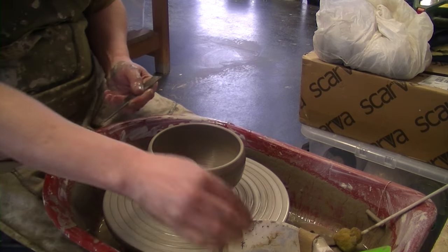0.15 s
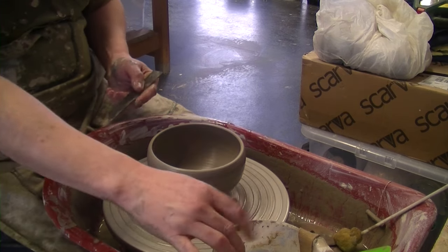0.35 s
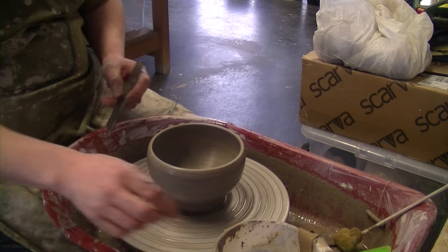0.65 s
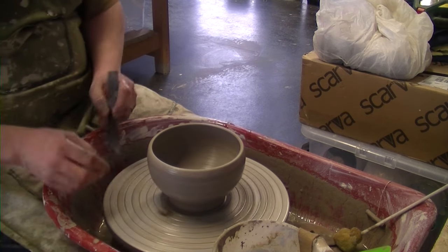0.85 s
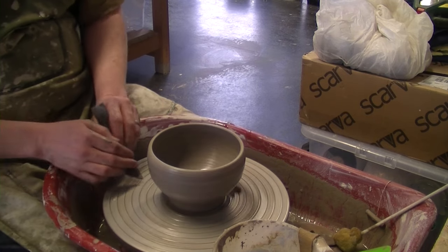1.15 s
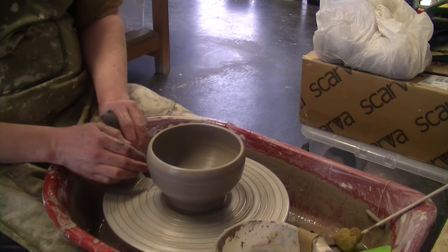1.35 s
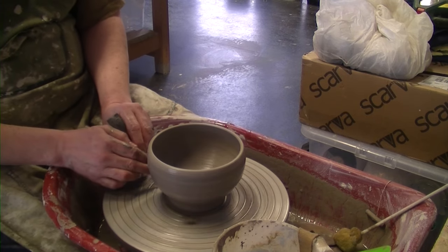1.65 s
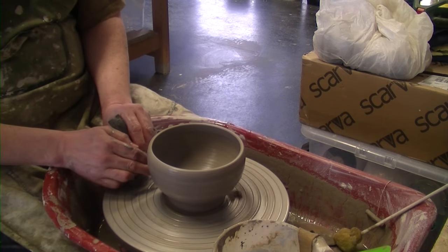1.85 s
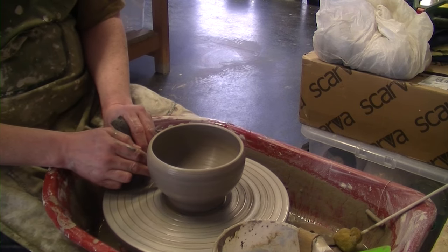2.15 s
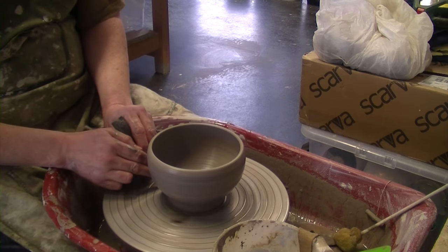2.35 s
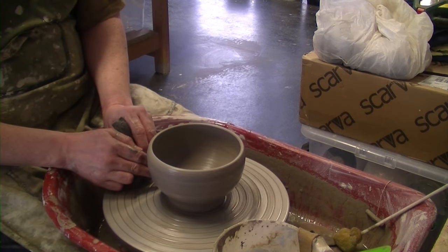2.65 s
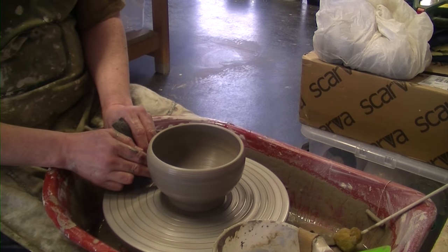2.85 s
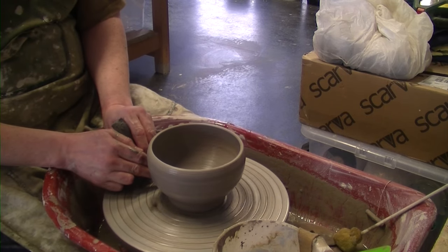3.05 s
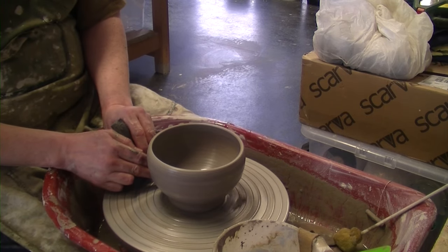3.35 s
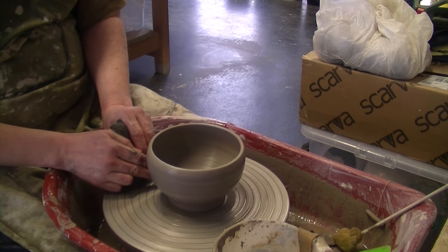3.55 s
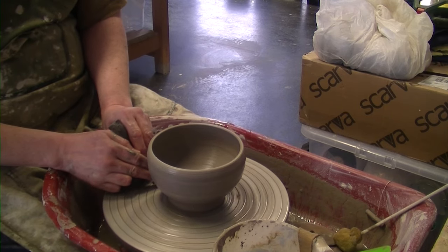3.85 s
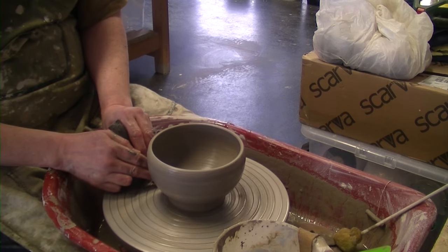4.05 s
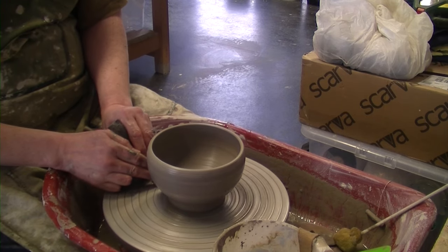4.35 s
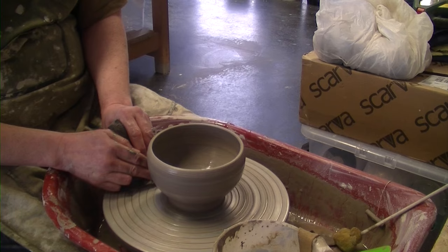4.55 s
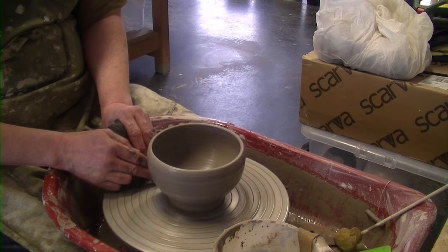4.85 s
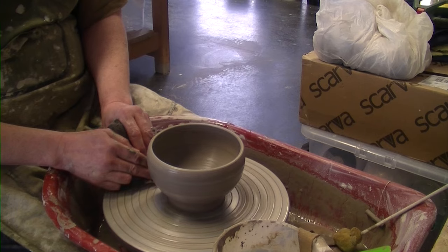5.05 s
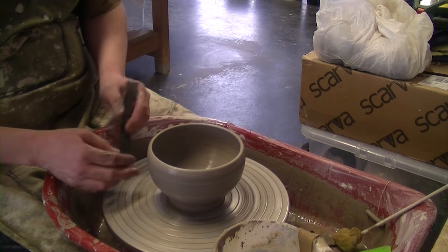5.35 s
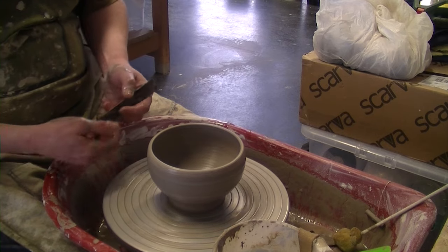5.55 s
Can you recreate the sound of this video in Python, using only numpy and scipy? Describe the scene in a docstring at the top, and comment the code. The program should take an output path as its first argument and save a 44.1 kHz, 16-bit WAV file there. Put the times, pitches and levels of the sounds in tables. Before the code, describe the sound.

Hands handle wet clay over a humming potter's wheel, then a tool scrapes the turning bowl, squealing slightly before flicking away.

```python
"""An electric potter's wheel hums and rumbles in a workshop. Hands shift and pick at wet things,
a tool is laid down with a tap, and palms slide over clay. The hum and rumble grow louder, then hold.
At 2.4 s a wooden tool bites into the foot of the spinning bowl, and grit rattles under its edge.
As it digs in, the scrape brightens and friction makes it sing and squeal.
At 5.3 s the tool is flicked away, and a few last ticks, bumps and rustles follow."""
import sys
import numpy as np
from scipy import signal
from scipy.fft import rfft, irfft
from scipy.io import wavfile
from scipy.ndimage import uniform_filter1d

SR = 44100
rng = np.random.default_rng(int(sys.argv[2]) if len(sys.argv) > 2 else 0)


def pcm_store(signal):
    """Save signal as 16-bit PCM."""
    levels = np.round(np.clip(np.atleast_2d(signal), -1, 1) * 32767)
    wavfile.write(sys.argv[1], SR, levels.astype(np.int16).T)


N = 250929
TIME = np.arange(N) / SR
FREQ = np.maximum(np.fft.rfftfreq(2 * N, 1 / SR), 1)

# Levels compare rows within a table. A rise, fall or decay is the time for a change of 60 dB.
# tone colour of the room's hiss: (frequency [Hz], level [dB])
HISS_COLOUR = [(2000, 0), (4300, 2.5), (5500, -8), (8000, -3), (15500, -14)]
# tones of the motor frame, mostly multiples of the mains frequency: (pitch [Hz], level [dB])
HUM_TONES = [(100.1, -29.5), (300.15, -10.5), (476.1, -19.5), (500.25, 1.5), (524.4, -17), (1297, -26.5),
             (1396.5, -17.5), (1497, -25.5), (1597, -25), (2245, -26), (2293, -26)]
# wavering tones of the drive: (pitch [Hz], level [dB])
DRIVE_TONES = [(158, -24), (240, -15), (323, -12.5), (359, -8), (424, -24.5)]
# tone colour of belt and bearings: (frequency [Hz], level [dB])
RUMBLE_COLOUR = [(25, -37), (55, -34), (85, -18), (130, -16), (200, -4.5), (280, -3), (335, 1.5), (480, 2),
                 (640, -2), (720, -3), (950, -12), (1200, -20.5), (1450, -18.5), (1900, -20), (2300, -18),
                 (2700, -28.5), (3200, -32), (4500, -27.5), (8000, -34.5)]

# arm movements that rustle a sleeve: (time [s], level [dB], rise [s], fall [s])
SLEEVE_MOVES = [(.115, -28, 0.82, 0.8), (.635, -37.5, 0.52, .28), (5.31, -28.5, .04, 0.52),
                (5.6, -36, 0.86, .45)]
# tone colour of the cloth: (frequency [Hz], level [dB])
SLEEVE_COLOUR = [(150, -5.5), (700, 1), (1200, -5), (2200, -11), (4000, -13), (10000, -23.5), (15500, -28)]
# palms sliding over wet clay: (time [s], level [dB], rise [s], fall [s])
PALM_SLIDES = [(.8, -41.5, .22, .7), (.93, -38.5, 0.98, 3), (1.22, -47.5, 0.9, 3.0)]
# tone colour of skin on clay: (frequency [Hz], level [dB])
PALM_COLOUR = [(900, 4), (2200, -1.5), (4200, -5), (4620, -4), (5000, -8), (6700, -7), (7900, -13.5),
               (9200, -16), (10200, -14), (11000, -17), (15500, -26)]
# the tool's flat side rubs the fingers, later the bowl: (time [s], level [dB], rise [s], fall [s])
TOOL_RUBS = [(.83, -47, .25, .9), (.95, -46, 0.97, 0.82), (3.92, -28.5, 1, 1.4)]
# where that rubbing rings: (frequency [Hz], width [Hz], level [dB])
RUB_RESONANCES = [(4600, 300, -4), (9140, 1800, 0)]
# ticks of wet clay: (time [s], level [dB])
CLAY_TICKS = [(.103, -21), (.117, -19), (.127, -18), (.643, -31), (.994, -30), (1.777, -34), (1.791, -35),
              (1.908, -28), (1.992, -35), (5.322, -18), (5.342, -17), (5.360, -17), (5.370, -18.5),
              (5.386, -24), (5.480, -28), (5.569, -27), (5.583, -20)]
# tone colour of a tick: (frequency [Hz], level [dB])
TICK_COLOUR = [(900, -22), (2000, -4), (3500, 4), (5500, -6.5), (9000, -6.5), (15000, -18)]
# bumps of hand and tool: (time [s], level [dB], decay [s], centre [Hz], width [Hz], hardness [0-1])
HAND_BUMPS = [(0.048, -24.5, 0.047, 900, 1800, 0), (.06, -43, 0.49, 115, 80, 0.1),
              (.098, -22, 0.19, 435, 650, 0), (0.115, -25, .07, 800, 1400, 0),
              (0.633, -38.5, .12, 3500, 2000, 0), (5.393, -14, 0.0076, 1160, 1200, 1),
              (5.393, -21, 0.04, 240, 220, 0.96), (5.588, -18, 0.042, 480, 420, 0.4),
              (5.599, -18, 0.029, 680, 600, 0.96), (5.599, -33, 0.026, 6800, 800, .7)]
# ringing of a tool laid on the splash pan: (pitch [Hz], level [dB], decay [s])
KNOCK_TONES = [(694, -27.5, 0.11), (977, -9.5, 0.021), (1150, -30, .04)]

# how far the edge has dug in: (time [s], depth [0 grazing, 1 cutting, 2 buried])
CUT_DEPTHS = [(3.1, 0.033), (3.27, 0.29), (3.7, 0.52), (3.83, 0.74), (4.05, 1.18), (4.3, 1.66), (5.3, 1.95)]
# tone colour of grit at each depth: (frequency [Hz], grazing [dB], cutting [dB], buried [dB])
GRIT_COLOUR = [(400, -10, -5, -6), (1020, -7, -11.5, -22), (2085, -3.5, 1, 3.5), (3200, -5.5, -1, -4.5),
               (4140, -1.5, 0, -2), (6530, -3.5, -0.5, -0.5), (9700, -13.5, -1, 3.5), (11200, -8, -5.5, -2),
               (13800, -12, -1.5, 3), (15400, -14, -10, -5.5)]
# boosts where tool and bowl ring: (frequency [Hz], width [Hz], grazing [dB], cutting [dB], buried [dB])
TOOL_RESONANCES = [(1166, 34, 9.5, 10, 22), (1782, 116, 6, 7, 8), (1970, 92, 1.5, 2.5, 3),
                   (2640, 210, 6.5, -1, -1), (2930, 106, 10.5, 1, -3), (3800, 240, 6.5, 6.5, 0.5),
                   (4396, 370, 3.5, 10.5, 5.5), (4900, 620, 6.5, 7.5, 9.5), (4870, 176, 7, 3.5, 3),
                   (5180, 70, 6.5, 3, 2), (5760, 190, -5, 7, 1), (6360, 110, 5, 6, -7),
                   (7670, 560, 3.5, 11.5, 6), (8360, 280, 8, 6, 6), (8920, 880, 6, 8, 0.5),
                   (10350, 530, 9, 5, 0), (11450, 370, -0.5, 0, 4), (13000, 500, 3, 6.5, -1)]
# hard grains catching the edge: (time [s], level [dB], decay [s])
GRAIN_CATCHES = [(2.433, -24, 0.021), (2.478, -14, 0.027), (2.536, -16, .028), (2.691, -20, .03),
                 (2.777, -21, 0.018), (2.92, -18, 0.12), (3.105, -18, 0.062), (3.209, -13.5, 0.096),
                 (3.216, -18, 0.065), (3.276, -18, 0.12)]
# the edge flicks off the clay: (time [s], level [dB], rise [s], fall [s])
FLICK_MOVES = [(5.262, -17, 0.098, 0.085), (5.293, -23.5, .1, 0.036)]
# tone colour of the flick: (frequency [Hz], level [dB])
FLICK_TONE_COLOUR = [(1500, -1), (4000, -5), (5500, 5), (7800, 0), (9500, -14), (10600, -4), (15000, -31)]
# tones the trembling edge sings: (pitch [Hz], width [Hz], level [dB], group [0 early, 1 late])
CHATTER_TONES = [(2385, 34, 0, 0), (2196, 12, -7, 1), (3390, 32, -.5, 1), (4743, 34, -.5, 1),
                 (4867, 24, -1.5, 1), (6200, 20, -6.5, 1)]
# how each group grows: (depth where growth stops [depth units], level there [dB], slope [dB per unit])
CHATTER_GROWTH = [(.9, -31.3, 14), (2.05, -31.5, 14)]
# short squeals of the edge: (time [s], level [dB], pitch [Hz])
SQUEALS = [(3.521, -31, 2385), (3.698, -26, 2385), (3.899, -27, 2385), (4.306, -27, 2385),
           (4.424, -23, 2385), (4.543, -26, 2385), (4.803, -28, 3390), (4.901, -24, 2385),
           (4.991, -30, 3390), (5.0, -27, 2385), (5.042, -24, 2365), (5.058, -25, 3370), (5.105, -29, 6200),
           (5.127, -26, 3390), (5.183, -27, 3390), (5.24, -25, 2385)]

SWELL_START_S, SWELL_END_S = 0.51, 3.24  # the wheel's sound starts and stops growing louder
BITE_S, LIFT_S = 2.42, 5.27  # the tool starts and stops cutting


def undb(db):
    """Turns decibels into a number to multiply by."""
    return 10 ** (np.asarray(db) / 20)


def unit(x):
    """Scales a signal to an average power of 1."""
    return x / np.sqrt(np.mean(x ** 2) + 1e-18)


def spectrum(rows, column=1):
    """Joins a table's points into a curve in dB; the bass falls away below the first."""
    rows = np.asarray(rows)
    bass_cut_db = 40 * np.log10(np.minimum(FREQ / rows[0, 0], 1))
    return np.interp(np.log(FREQ), np.log(rows[:, 0]), rows[:, column]) + bass_cut_db


def resonance(hz, width_hz):
    """The curve in dB of something that rings around one frequency."""
    return -10 * np.log10(1 + ((FREQ ** 2 - hz ** 2) / (FREQ * width_hz)) ** 2)


def colour(x, db):
    """Shapes a sound's tone with a curve in dB; white noise would keep its power."""
    cepstrum = irfft(np.log(unit(undb(db)) + 1e-6))
    # this fold puts the ringing after each hit, never before it
    cepstrum[1:N] *= 2
    cepstrum[N + 1:] = 0
    return irfft(rfft(x, 2 * N) * np.exp(rfft(cepstrum)))[:N]


def noise():
    """White noise, an even hiss."""
    return rng.standard_normal(N)


def wander(per_s):
    """A smooth random wobble of size about 1, with per_s new values a second."""
    hold = max(int(SR / per_s), 1)
    steps = noise()[np.arange(N) // hold]
    return unit(uniform_filter1d(uniform_filter1d(steps, hold), hold))


def grains(per_s, spread_db):
    """Tiny hits of uneven strength at random moments."""
    hits = rng.random(N) < per_s / SR
    return unit(hits * np.sign(noise()) * undb(spread_db * np.minimum(rng.exponential(size=N), 5)))


def burst(s, db, decay):
    """A sudden crunch of noise that dies away."""
    age = TIME - s
    return noise() * (age >= 0) * undb(db - 60 * np.maximum(age, 0) / decay)


def blow(s, db, decay, hardness):
    """A crunch; the harder it is, the more of its energy goes into one opening click."""
    click = np.diff(TIME >= s, prepend=False) * undb(db) * np.sqrt(decay * SR / (2 * np.log(1000)))
    return np.sqrt(hardness) * click + np.sqrt(1 - hardness) * burst(s, db, decay)


def wavering(hz, width_hz):
    """A tone whose pitch trembles at random."""
    pitch = hz + width_hz / 2 * wander(4 * width_hz)
    return unit(np.sin(2 * np.pi * np.cumsum(pitch) / SR))


def ramp(start, end):
    """Rises evenly from 0 to 1 between two moments."""
    return np.clip((TIME - start) / (end - start), 0, 1)


def swell(s, db, rise, fall):
    """Loudness of one movement: it climbs, peaks at time s and drops."""
    return undb(db - 60 * np.maximum((s - TIME) / rise, (TIME - s) / fall))


def swells(rows):
    """Loudness of several movements, whose powers add up."""
    return np.sqrt(sum(swell(*row) ** 2 for row in rows))


def room_hiss(db=-53.5):
    """The faint, steady hiss of the room."""
    return undb(db) * colour(noise(), spectrum(HISS_COLOUR))


def workshop(x, pan_db=-11, tail_db=-13):
    """Adds quick echoes from the splash pan and a short tail from floor and walls."""
    pan = burst(0.00067, 0, decay=0.042)
    tail = colour(burst(0.0059, 0, decay=0.68), resonance(2100, 4500))
    echoes = (undb(pan_db) * unit(pan) + undb(tail_db) * unit(tail)) / np.sqrt(N)
    return x + signal.fftconvolve(x, echoes)[:N]


def wheel_loudness(start_db, added_db):
    """Loudness of a wheel part: it grows steadily, then holds."""
    return undb(start_db + added_db * ramp(SWELL_START_S, SWELL_END_S))


def motor_hum(shaft_hz=24.2, throb=0.16, waver_db=1.5):
    """Mains current shakes the motor frame, and the hum throbs as the shaft turns."""
    shaft_angle = 2 * np.pi * shaft_hz * TIME + 0.25 * wander(4.5)
    hum = 0
    for hz, db in HUM_TONES:
        hum += undb(db + waver_db * wander(9)) * np.sin(2 * np.pi * (hz * TIME + rng.random()))
    return np.sqrt(2) * hum * (1 + throb * np.sin(shaft_angle)) * wheel_loudness(-33.5, 5.5)


def frame_drone(hz=99, turn_s=0.752, heavy_side_s=0.54):
    """The frame's low drone swells once in each turn of the wheel."""
    turn_db = 8.5 * np.cos(2 * np.pi * (TIME - heavy_side_s) / turn_s)
    return undb(turn_db) * np.sin(2 * np.pi * hz * TIME + 0.6 * wander(10)) * wheel_loudness(-59.5, 5.5)


def drive_whir(sway_db=4.0):
    """The drive's tones waver in loudness and pitch."""
    whir = 0
    for hz, db in DRIVE_TONES:
        whir += undb(db + sway_db * wander(6)) * np.sin(2 * np.pi * hz * TIME + 1.53 * wander(7))
    return np.sqrt(2) * whir * wheel_loudness(-37, 7)


def bearing_rumble(buzz=0.22):
    """Belt and bearings rumble, shaken as the motor's pull ripples at twice the mains frequency."""
    ripple = 1 + buzz * np.sin(2 * np.pi * HUM_TONES[0][0] * TIME)
    return colour(noise() * ripple, spectrum(RUMBLE_COLOUR)) * wheel_loudness(-35, 5.5)


def rubbing():
    """Sleeves, palms and the flat of the tool slide along in thousands of tiny slips."""
    sleeve = colour(grains(per_s=4000, spread_db=4.0), spectrum(SLEEVE_COLOUR))
    palm = colour(grains(per_s=9000, spread_db=2.5), spectrum(PALM_COLOUR))
    slips = grains(per_s=9000, spread_db=-2.0)
    tool = sum(undb(db) * colour(slips, 2 * resonance(hz, width)) for hz, width, db in RUB_RESONANCES)
    return sleeve * swells(SLEEVE_MOVES) + palm * swells(PALM_SLIDES) + unit(tool) * swells(TOOL_RUBS)


def ticks_and_bumps():
    """Wet clay ticks sharply, and hand and tool bump into things."""
    ticks = sum(blow(s, db, decay=0.0048, hardness=1) for s, db in CLAY_TICKS)
    bumps = sum(colour(blow(s, db, decay, hardness), 2 * resonance(hz, width))
                for s, db, decay, hz, width, hardness in HAND_BUMPS)
    return colour(ticks, spectrum(TICK_COLOUR)) + bumps


def knock(start_s=0.433, contact_s=0.002):
    """A tool laid on the pan gives one hollow tap; wet clay softens its start."""
    age = np.maximum(TIME - start_s, 0)
    ring = sum(undb(db - 60 * age / decay) * np.sin(2 * np.pi * hz * age)
               for hz, db, decay in KNOCK_TONES)
    return ring * (1 - np.exp(-(age / contact_s) ** 2))


def contact(attack_s=0.12, fall_s=0.2):
    """Loudness of the cut: a sudden bite, a hold and a quick release."""
    release_db = -60 * np.maximum(TIME - LIFT_S, 0) / fall_s
    return ramp(BITE_S, BITE_S + attack_s) * undb(release_db)


def cut_depth():
    """How deep the edge sits in the clay at every moment."""
    return np.interp(TIME, *np.transpose(CUT_DEPTHS))


def tool_colour(stage):
    """The grit's tone plus the ringing of tool and bowl, at depth 0, 1 or 2."""
    boost_db = sum(boosts[stage] / (1 + ((FREQ - hz) / (width / 2)) ** 4)
                   for hz, width, *boosts in TOOL_RESONANCES)
    return spectrum(GRIT_COLOUR, column=stage + 1) + boost_db


def brush():
    """Before it bites, the edge only brushes the wet surface, which sounds duller."""
    touch = colour(grains(per_s=3500, spread_db=2.5), tool_colour(0) + 2 * resonance(2900, 8000))
    return touch * swell(BITE_S, db=-40, rise=0.7, fall=0.3)


def catches():
    """Hard grains catch the edge with short crunches."""
    crunches = sum(burst(*row) for row in GRAIN_CATCHES)
    return colour(crunches, tool_colour(0) + resonance(2200, 6600))


def flick():
    """The edge leaves the clay with a quick, gritty swish."""
    return colour(grains(per_s=5400, spread_db=3.0), spectrum(FLICK_TONE_COLOUR)) * swells(FLICK_MOVES)


def chatter(stutter=0.78):
    """Friction keeps a few tones trembling, louder in a deep cut, with short squeals on top."""
    depth, singing = cut_depth(), 0
    for hz, width, db, group in CHATTER_TONES:
        full_depth, full_db, slope = CHATTER_GROWTH[group]
        level_db = db + full_db - slope * np.maximum(full_depth - depth, 0)
        grip = 1 + stutter * np.tanh(wander(150))
        singing += unit(wavering(hz, width) * grip) * undb(level_db)
    squeals = sum(swell(s, db, rise=0.08, fall=0.11) * wavering(hz, width_hz=24)
                  for s, db, hz in SQUEALS)
    return singing * contact() + squeals


def scrape(graze_db=-25.5, cut_change_db=6, bury_change_db=-1.66, flutter_db=0.77):
    """A stream of grit hits the tool and rings it; tone and loudness shift as the edge digs in."""
    depth, grit = cut_depth(), 0
    for stage in range(3):  # fade from grazing to cutting to buried
        share = np.sqrt(np.clip(1 - abs(depth - stage), 0, 1))
        grit += share * colour(grains(per_s=13000, spread_db=2.0), tool_colour(stage))
    level_db = graze_db + cut_change_db * np.minimum(depth, 1) + bury_change_db * np.maximum(depth - 1, 0)
    return grit * contact() * undb(level_db + flutter_db * wander(70))


def scene():
    """Hiss, wheel, hands and tool together, the same in both channels."""
    background = room_hiss() + motor_hum() + frame_drone() + drive_whir() + bearing_rumble()
    singing = chatter()
    tool = scrape() + brush() + catches() + flick()
    hands = rubbing() + ticks_and_bumps() + knock()
    mono = background + singing + workshop(hands + tool)
    return np.array([mono, mono])


def record(dry, top_hz=15700):
    """Cuts off the very highest treble steeply."""
    return signal.sosfilt(signal.ellip(12, .2, 80, top_hz, fs=SR, output="sos"), dry)


dry = scene()
out = record(dry)
pcm_store(out)
```